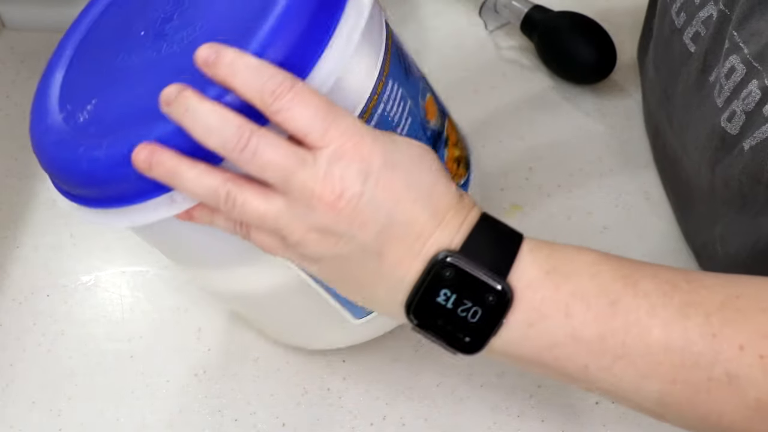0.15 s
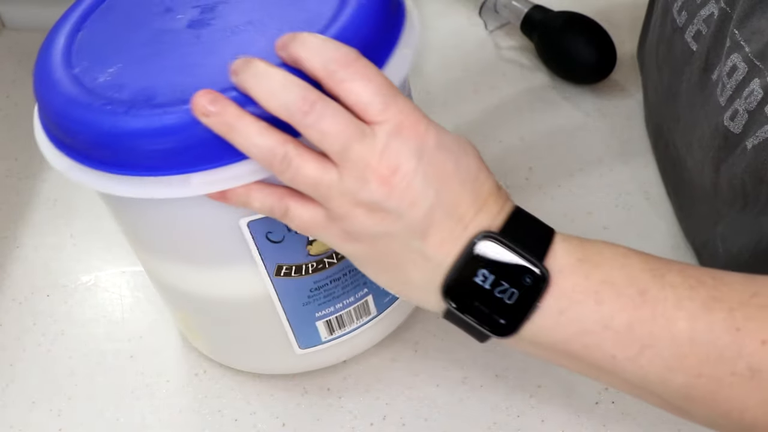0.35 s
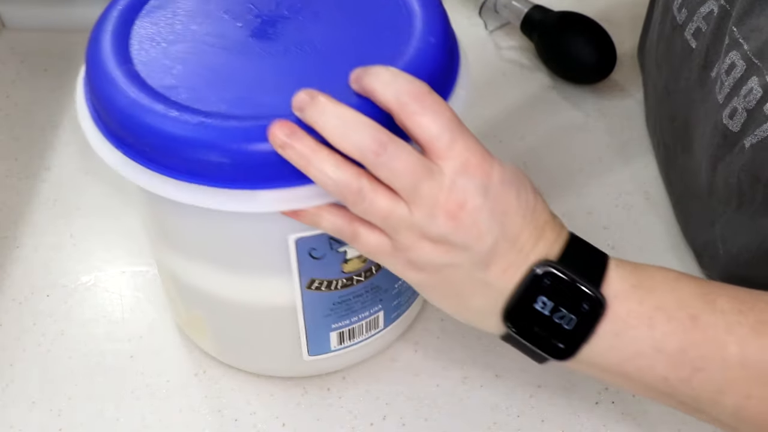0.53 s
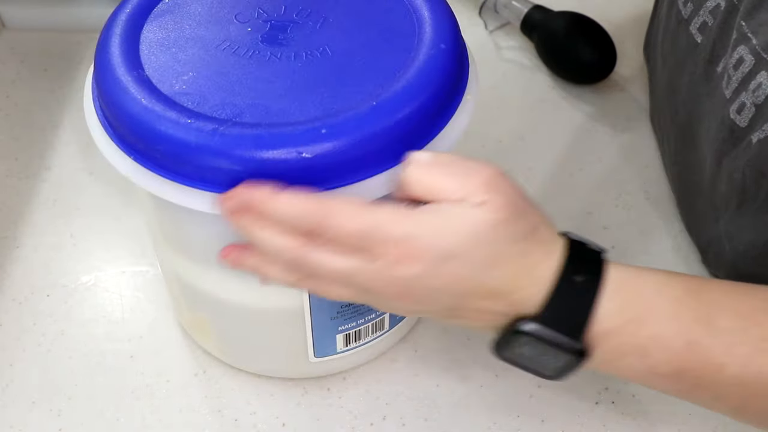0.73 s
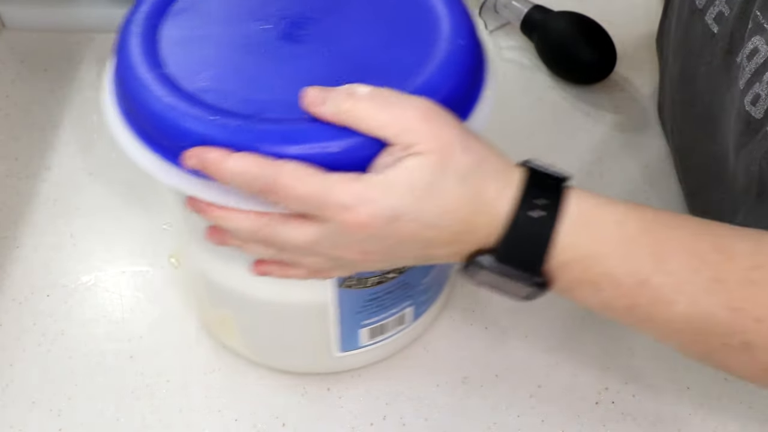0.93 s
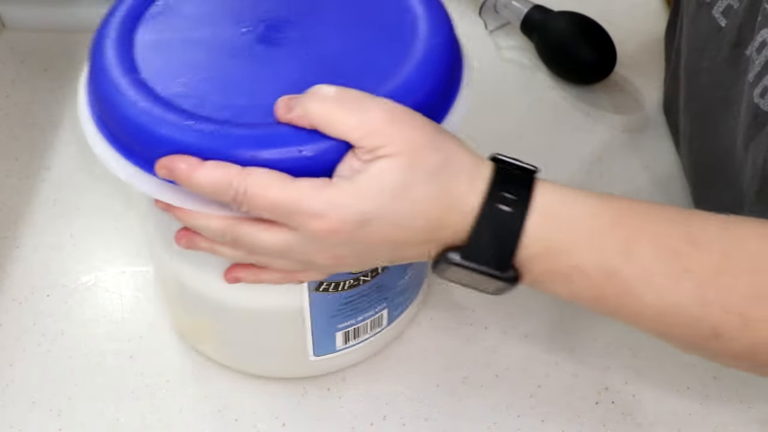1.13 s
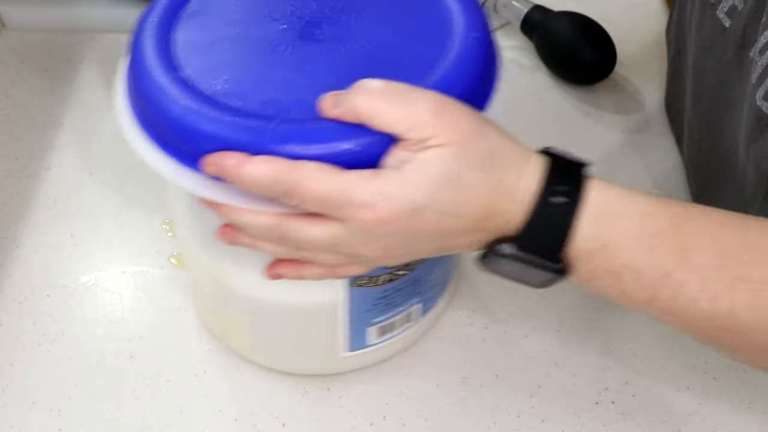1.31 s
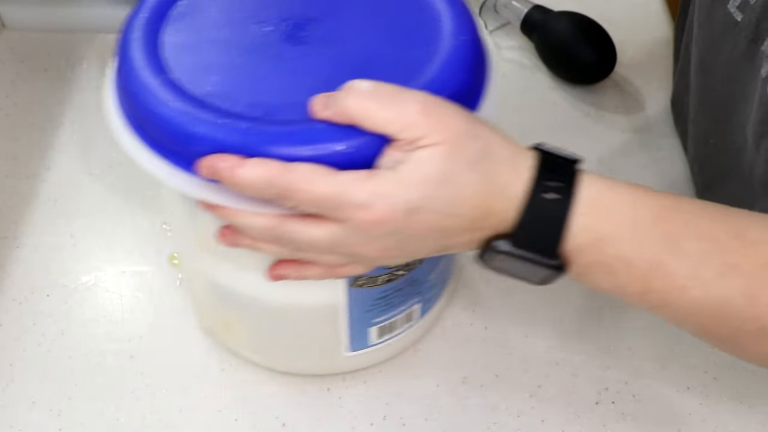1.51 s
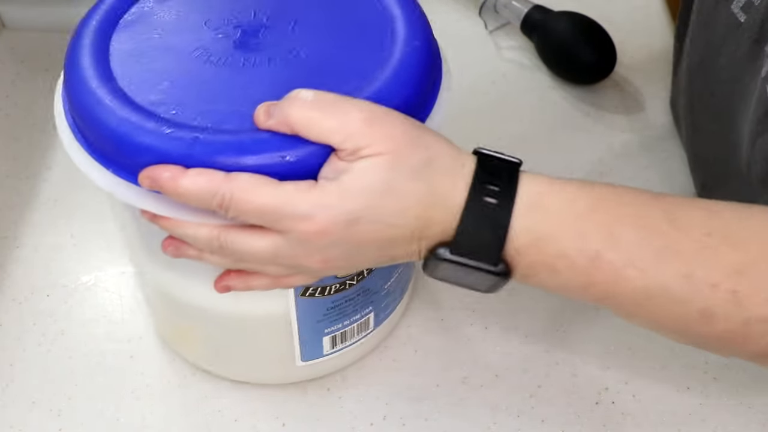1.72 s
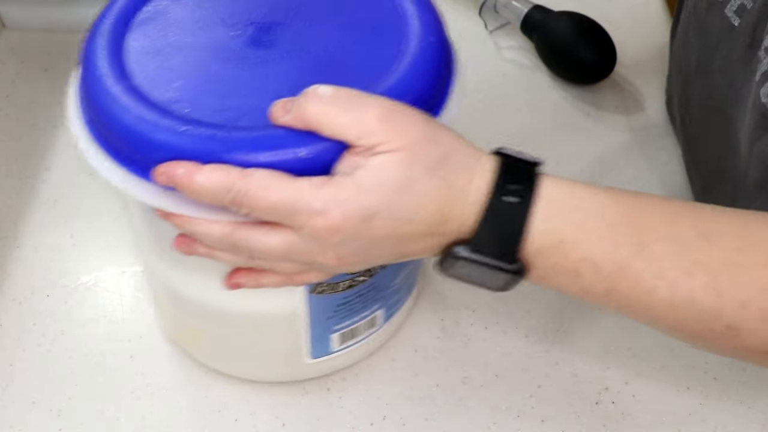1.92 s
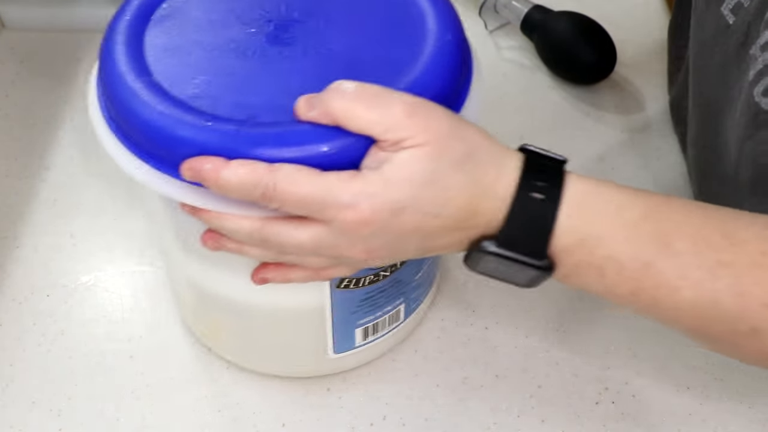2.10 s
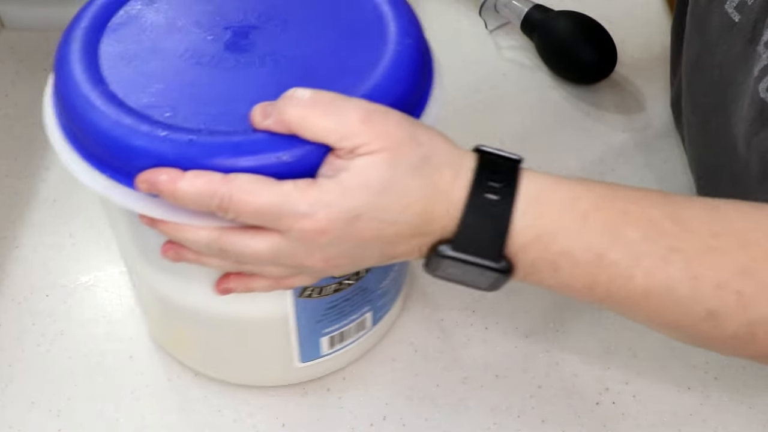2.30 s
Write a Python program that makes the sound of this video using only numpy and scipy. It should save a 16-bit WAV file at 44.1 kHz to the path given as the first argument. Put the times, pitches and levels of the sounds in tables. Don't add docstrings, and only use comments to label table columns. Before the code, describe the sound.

A lidded plastic tub lands on a hard counter at about 0.24 s with a loud, hollow, quickly choked thump and a rim crack. Soft bumps settle until 0.45 s. A hand touches at 0.67 s and grips with a stuttering skin squeak around 0.82 s. From 0.9 s to the end, rapid alternating scrapes hiss, with dull knocks and lid ticks. Faint appliance hum, small room, close microphone.

```python
import sys
import numpy as np
from scipy import signal
from scipy.fft import rfft, irfft
from scipy.io import wavfile
from scipy.ndimage import uniform_filter1d

SR = 44100
rng = np.random.default_rng(int(sys.argv[2]) if len(sys.argv) > 2 else 0)


def file_out(sig):
    cols = np.atleast_2d(sig).T
    lim = np.clip(cols, -1, 1)
    pcm = np.round(lim * 32767).astype(np.int16)
    wavfile.write(sys.argv[1], SR, pcm)


def amplitude_ratio(level_db):
    exponent = np.asarray(level_db, float) / 20
    return 10 ** exponent


N = 103635

# pitch_hz, level_db_rms
HUM = [(40, -83), (60, -46.5), (120, -93.5), (180, -51), (240, -73), (298, -59.5), (360, -60.5),
       (420, -60.5)]
# pitch_hz, level_db_rms
WHINE = [(12559, -77), (15073, -82)]
# freq_hz, level_db_per_hz
AIR = [(120, -7.5), (180, -0.5), (227, 0.5), (480, -5), (546, -6), (996, -11), (1260, -11), (2770, -20),
       (15700, -31)]
# freq_hz, t60_s
ROOM = [(150, 0.21), (500, 0.6), (2000, 0.44), (8000, 0.38)]
# start_s, level_db, pitch_hz, t60_s
BUMPS = [(.202, -32.5, 223, .2), (0.302, -32, 136, 0.22), (0.319, -35, 86, 0.16),
         (0.381, -24.5, 207.2, 0.26), (0.406, -34, 202, 0.17), (0.449, -37, 205, .15),
         (0.675, -33, 133, 0.3), (.998, -46, 110, .1), (1.107, -42, 320, 0.082), (1.265, -25.5, 100, 0.081),
         (1.283, -32, 70, 0.17), (1.331, -42, 119, 0.089), (1.379, -34, 59.6, 0.19),
         (1.386, -28, 203.7, 0.3), (1.53, -49, 113, .15), (1.575, -26.5, 127, 0.11),
         (1.679, -34, 71.6, 0.11), (1.871, -33, 110, 0.066), (1.92, -42, 124, 0.14),
         (2.138, -36, 80, 0.094)]
# start_s, hollow_db, knock_db, contact_ms
THUMPS = [(.2387, -.5, -24, .9), (0.385, -40, -40, 1), (0.664, -45, -30, 1), (0.669, -19, -36, 1.2),
          (.6715, -45, -24, .8), (.699, -30, -50, 1.5), (0.817, -36, -30.5, 0.37),
          (0.991, -66, -22.5, 1.38), (1.269, -24, -44, 1.3), (1.281, -27, -41, 0.78),
          (1.329, -20, -39, 0.63), (1.459, -27.5, -51, 0.8), (1.5745, -40, -20, .6), (1.5795, -19, -26, 1),
          (1.589, -27.5, -21, 1.38), (1.608, -34, -26.5, 0.89), (1.666, -31.5, -36, 1.2),
          (1.8736, -62, -12, 0.7), (1.879, -32.5, -19.5, .4)]
# pitch_hz, level_db, t60_s
HOLLOW = [(79, -10, .07), (226, -8.5, .085), (256, -4.5, .066), (402, -11, .032), (150, -6, .078),
          (199, -2.3, .26), (300, -20, .14), (330, -23, .1)]
# pitch_hz, level_db, t60_s
WALL = [(377, -3.5, 0.017), (448, -12.5, 0.04), (529, -15, 0.063), (609, -12, 0.046), (868, -15, 0.12),
        (1250, -9, 0.072), (1680, -48, .03), (2540, -6, 0.027), (4050, -6.5, .015), (6000, -19, .012)]
# pitch_hz, level_db, t60_s
RIM = [(449, -28.5, 0.077), (537, -22, 0.048), (606, -29.5, 0.026), (773, -15, 0.016), (820, -30.5, 0.021),
       (1235, -30.5, 0.027), (1330, -23, 0.028), (1560, -17, 0.015), (1660, -32, 0.014),
       (2750, -26.5, 0.012), (3100, -32, .012), (3970, -31.5, 0.033), (5540, -30, 0.013),
       (7020, -43, 0.014)]
# freq_hz, t60_s
BUZZ = [(250, 0.045), (700, 0.031), (1500, 0.085), (4000, .03), (9000, .012)]
# start_s, peak_db, pitch_hz
TICKS = [(1.067, -42, 1500), (1.0772, -24.5, 1540), (1.081, -35, 1510), (1.142, -32.5, 1510),
         (1.1558, -30.5, 1505), (1.1774, -32, 1400), (1.188, -27, 1500), (1.2128, -30, 1500),
         (1.232, -30, 1500), (1.3379, -14, 1570), (1.4594, -25, 1587), (1.5543, -29, 1426),
         (1.5739, -25.5, 1500), (1.6851, -32.5, 1540), (1.7604, -23, 1530), (1.9156, -21.5, 1536),
         (1.9932, -34, 1500), (2.0416, -24.5, 1510), (2.1327, -31, 1520), (2.1957, -20.5, 1564),
         (2.198, -42, 1610), (2.252, -40.5, 1460), (2.3203, -25.5, 1517)]
# pitch_ratio, level_db, t60_s
LID = [(.375, -13, .04), (.93, -15, .045), (1.001, 0, .024), (1.04, -8, .018), (1.4, -11, .014),
       (1.52, -10, .014), (2.3, -18, .01)]
# start_s, length_s, level_db
GRIPS = [
    (0.064, 0.011, -52),
    (0.665, 0.011, -45),
    (0.757, 0.055, -55),
    (0.81, 0.044, -35.5),
    (0.836, 0.015, -44),
    (0.855, 0.023, -43.5),
]
# freq_hz, width_hz, level_db
PALM = [(1700, 280, -3), (2410, 230, 2), (2890, 160, 4), (4370, 270, -3), (5870, 880, 0.5),
        (10600, 3400, -6)]
# start_s, peak_db, pitch_ratio (1 = open palm)
SNAPS = [(0.6627, -35.5, .9), (0.6685, -35, .95), (0.67, -38, .7), (.6726, -42, 1.9), (.6776, -35, 1.05),
         (0.6855, -49, 0.8), (.8121, -25, 1.03), (.8134, -26, .9), (.8155, -28, 1.03), (.8169, -28, .97),
         (.8217, -25, 1.02), (.8239, -21, 1), (.8259, -26, 1.02), (.8275, -19, 1), (.8287, -20, .99),
         (.8302, -22, 1.01), (.8316, -27, 1.02), (.8342, -21, 1), (.8363, -23, 1.02), (.8398, -31, 1),
         (.8456, -34, 1.3), (.8547, -31, 1.2), (.8586, -31, 1.15), (.8616, -27, 1.55), (.8632, -29, 1.58),
         (.8669, -29, 1.45), (1.3396, -25.5, 2.2), (1.4597, -30, 1.2), (2.1958, -39, 1.3)]
# pitch_hz, level_db, t60_s
SNAP = [(1700, -1, .02), (1870, -5, .016), (2290, -4, .014), (2720, -8, .012), (3030, -6, .012),
        (4180, -9, .01), (6800, -22, .007)]
# start_s, length_s, level_db, top_speed_place_0_1, base_weight_db
STROKES = [(.001, 0.26, -64.5, 0.04, 3), (0.208, 0.28, -54.5, 0.4, 8), (0.872, 0.15, -56.5, 0.73, 9.5),
           (0.956, .15, -41.5, 0.6, -6), (1.102, 0.15, -42.5, 0.64, 2.1), (1.243, 0.13, -38.5, 0.65, 4),
           (1.353, 0.16, -40, 0.67, 1.8), (1.529, 0.12, -41, 0.46, 5), (1.66, 0.14, -43, 0.58, 1.5),
           (1.818, 0.12, -44.5, 0.46, 4.5), (1.94, 0.14, -44.5, 0.58, 1.5), (2.098, 0.12, -44.5, 0.52, 6),
           (2.216, 0.16, -46, 0.54, 3)]
# freq_hz, width_hz, level_db
BASE = [(337, 46, -8), (596, 73, -15), (876, 49, -9), (1500, 220, -5.5), (1830, 433, -8), (3187, 650, -7),
        (3585, 540, -6), (5245, 685, -8), (5620, 1550, -8.5)]
# freq_hz, level_db_per_hz
HISS = [(88, -38), (150, -58), (521, 5), (711, -4.5), (1550, 0.5), (2200, -11.5), (5270, -3.5),
        (15700, -68)]
# freq_hz, level_db_per_hz
FIZZ = [(6000, -16), (8500, 0), (12000, -3), (15800, -8)]

HELD_RING_RATIO = 0.52


def evened(x):
    return x / np.sqrt(np.mean(x ** 2) + 1e-20)


def read(points, hz):
    f, value = np.transpose(points)
    return np.interp(np.log(hz + 1), np.log(f + 1), value)


def add(mix, start_s, sound):
    part = mix[round(start_s * SR):][:len(sound)]
    part += sound[:len(part)]


def noise():
    return rng.standard_normal(N)


def colour(x, points):
    hz = np.fft.rfftfreq(len(x), 1 / SR)
    gain = amplitude_ratio(read(points, hz)) * (hz > points[0][0] / 2)
    return evened(irfft(rfft(x) * gain, len(x)))


def resonate(x, hz, width_hz):
    r = np.exp(-np.pi * width_hz / SR)
    return evened(signal.lfilter([1, 0, -1], [1, -2 * r * np.cos(2 * np.pi * hz / SR), r * r], x))


def resonate_twice(x, hz, width_hz):
    return resonate(resonate(x, hz, 2 * width_hz), hz, 2 * width_hz)


def drift(rate_per_s):
    size = int(SR / rate_per_s)
    return evened(uniform_filter1d(uniform_filter1d(noise(), size), size))


def ring(modes, pitch=1, keep=1, wave=np.sin, size=SR // 2):
    t = np.arange(size) / SR
    return sum(amplitude_ratio(db - 60 * t / (t60_s * keep)) * wave(2 * np.pi * hz * pitch * t)
               for hz, db, t60_s in modes)


def dying(x, decays):
    hz, t, z = signal.stft(x, SR, nperseg=256)
    decay = amplitude_ratio(-60 * t / read(decays, hz)[:, None])
    return signal.istft(z * decay * (hz > 300)[:, None], SR, nperseg=256)[1][:len(x)]


def struck(x, contact_ms):
    t_ms = np.arange(SR // 80) / SR * 1000
    push = np.sin(np.pi * np.clip(t_ms / contact_ms, 0, 1))
    return signal.oaconvolve(x, push / push.sum())


def kitchen():
    air_db, low_air_db, handling_db = -49, -51.5, -51
    hum_waver_db, air_swell_db, shudder_swing_db = 1.0, .8, 5.5
    t = np.arange(N) / SR
    hum = np.zeros(N)
    for hz, db in HUM:
        level = np.sqrt(2) * amplitude_ratio(db + hum_waver_db * drift(11))
        hum += level * np.sin(2 * np.pi * (hz * t + rng.random()))
    for hz, db in WHINE:
        hum += amplitude_ratio(db) * resonate(noise(), hz, 40)
    air = amplitude_ratio(air_db + air_swell_db * drift(12)) * colour(noise(), AIR)
    low = colour(noise(), [(16, -16), (40, 17), (90, -43.0), (200, 15.5), (300, -15), (1000, -98)])
    shudder = colour(noise(), [(16, -2), (50, 0), (120, -23), (250, -35), (1000, -83)])
    moving = np.interp(t, [.2, .26, .5, .95, 1.3, 2.3], [0, 1.0, 0.074, 0.39, 1.0, 1.0])
    shudder *= moving * amplitude_ratio(handling_db + shudder_swing_db * drift(6.9))
    return hum + air + amplitude_ratio(low_air_db) * low + shudder


def room(x):
    taps = np.zeros(SR // 2)
    at = np.arange(260, len(taps) - 20, 20)
    taps[at + rng.integers(0, 20, len(at))] = rng.choice([-1., 1.], len(at))
    tail = dying(taps, ROOM)
    return signal.fftconvolve(x, tail / np.linalg.norm(tail))[:N]


def bumps():
    out = np.zeros(N)
    for start_s, db, hz, t60_s in BUMPS:
        add(out, start_s, struck(-ring([(hz, db, t60_s)]), contact_ms=3))
    return out


def set_down():
    start_s, rattle_db = .2398, -24.5
    out = np.zeros(N)
    add(out, start_s, struck(ring(RIM), contact_ms=.09))
    rattle = amplitude_ratio(rattle_db) * dying(rng.standard_normal(SR // 2), ROOM)
    add(out, start_s, struck(rattle, contact_ms=0.41))
    return out


def thumps():
    held_s, press_delay_s, press_db, buzz_db = .3, .093, -24, 2.5
    inward = 4
    out, wall = np.zeros(N), ring(WALL)
    t = np.arange(len(wall)) / SR
    for start_s, hollow_db, knock_db, contact_ms in THUMPS:
        keep = HELD_RING_RATIO if start_s > held_s else 1
        hollow = ring(HOLLOW[inward:], 1, keep, np.cos) - ring(HOLLOW[:inward], 1, keep, np.cos)
        if start_s < held_s:
            hollow *= amplitude_ratio(press_db * np.clip((t - press_delay_s) * 50, 0, 1))
        knock = wall + amplitude_ratio(buzz_db) * dying(rng.standard_normal(len(wall)), BUZZ)
        add(out, start_s, struck(amplitude_ratio(hollow_db) * hollow + amplitude_ratio(knock_db) * knock, contact_ms))
    return out


def ticks():
    rise_s, size = .0017, 4096
    out = np.zeros(N)
    rise = np.minimum(np.arange(size) / SR / rise_s, 1)
    for start_s, db, hz in TICKS:
        add(out, start_s, amplitude_ratio(db) * rise * ring(LID, hz, size=size))
    return out


def grips():
    t, level = np.arange(N) / SR, np.zeros(N)
    for start_s, length_s, db in GRIPS:
        level += amplitude_ratio(db) * np.sin(np.pi * np.clip((t - start_s) / length_s, 0, 1) ** .6)
    size_db = 2.5 * np.minimum(rng.exponential(1, N), 2.5)
    grain = rng.standard_normal((len(PALM), N)) * amplitude_ratio(size_db) * (rng.random(N) < .3)
    rub = sum(amplitude_ratio(db) * resonate_twice(x * level, hz, width_hz)
              for x, (hz, width_hz, db) in zip(grain, PALM))
    return evened(rub) * np.sqrt(np.mean(level ** 2))


def snaps():
    level_db, rise_s, size = -3, .0007, 2048
    out = np.zeros(N)
    rise = np.minimum(np.arange(size) / SR / rise_s, 1)
    for start_s, db, pitch in SNAPS:
        sound = np.zeros(size)
        for mode in SNAP:
            shade, sign = rng.uniform(-1, 1, 2)
            sound += np.sign(sign) * amplitude_ratio(2 * shade) * ring([mode], pitch, size=size)
        add(out, start_s, amplitude_ratio(db + level_db) * rise * sound)
    return out


def slides():
    hiss_db, fizz_db, rumble_db = -2, -10.5, -7
    speed_power, fizz_power, heavy_hz = 0.77, 1.33, 2500
    slips_per_s, slip_spread_db, grain_db = 5500, -0.5, 2.6
    t = np.arange(N) / SR
    speed, fizz, heavy = np.zeros((3, N))
    for start_s, length_s, db, top, weight_db in STROKES:
        skew = np.log(.5) / np.log(np.clip(top, .1, .9))
        arch = abs(np.sin(np.pi * np.clip((t - start_s) / length_s, 0, 1) ** skew))
        speed += amplitude_ratio(db) * arch ** speed_power
        heavy += amplitude_ratio(db + weight_db) * arch ** speed_power
        fizz += amplitude_ratio(db) * arch ** fizz_power
    slip_db = slip_spread_db * np.minimum(rng.exponential(1, N), 3)
    slips = noise() * amplitude_ratio(slip_db) * (rng.random(N) < slips_per_s / SR)
    body = np.zeros(N)
    for hz, width_hz, db in BASE:
        drive = heavy if hz < heavy_hz else speed
        body += amplitude_ratio(db + grain_db * drift(34)) * resonate_twice(slips, hz, width_hz) * drive
    hiss = amplitude_ratio(hiss_db) * colour(noise(), HISS)
    top_hiss = amplitude_ratio(fizz_db) * colour(noise(), FIZZ)
    hollow = evened(signal.oaconvolve(noise(), ring(HOLLOW, 1, HELD_RING_RATIO))[:N])
    rumble = amplitude_ratio(rumble_db + 4.8 * drift(17)) * hollow
    return body + speed * hiss + heavy * rumble + fizz * top_hiss


def scene():
    room_db, low_cut_hz = -9.5, 32
    tub = bumps() + set_down() + thumps() + grips() + snaps() + slides()
    tub = signal.lfilter(*signal.butter(2, low_cut_hz, "high", fs=SR), tub)
    lid = ticks()
    mix = kitchen() + amplitude_ratio(room_db) * room(tub + .5 * lid) + tub + lid
    return mix[None]


def top_cut(x):
    return signal.sosfilt(signal.butter(12, 15820, fs=SR, output="sos"), x)


def record(dry):
    mix = np.clip(dry, -1.0, 1.0)
    return top_cut(mix)


dry = scene()
out = record(dry)
file_out(out)
```